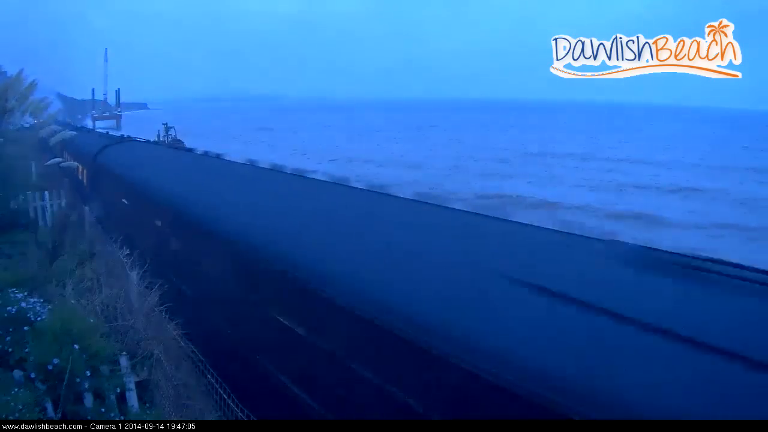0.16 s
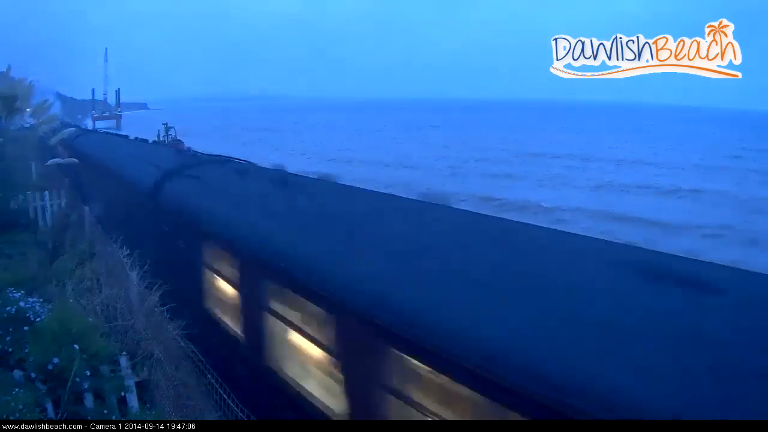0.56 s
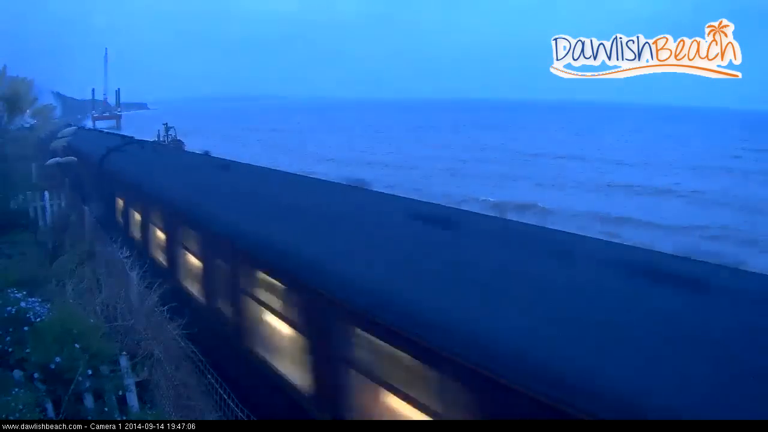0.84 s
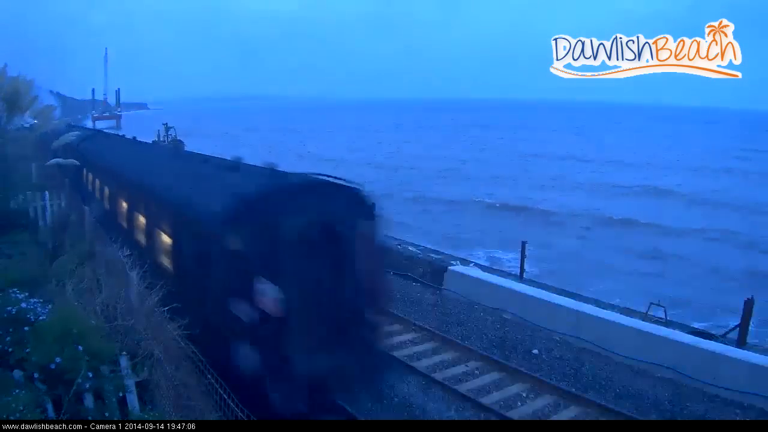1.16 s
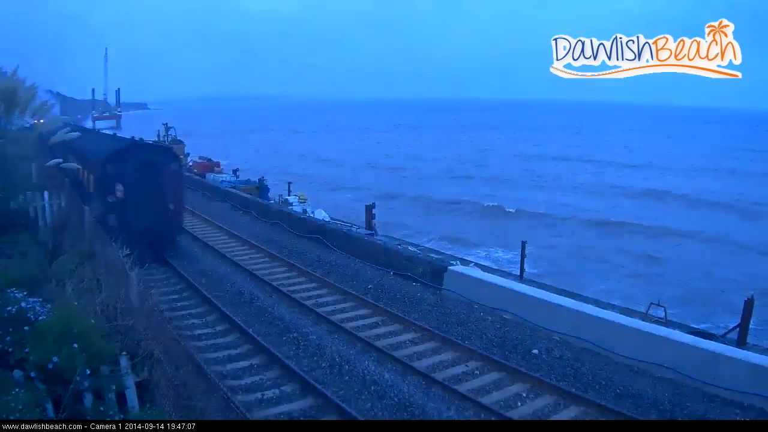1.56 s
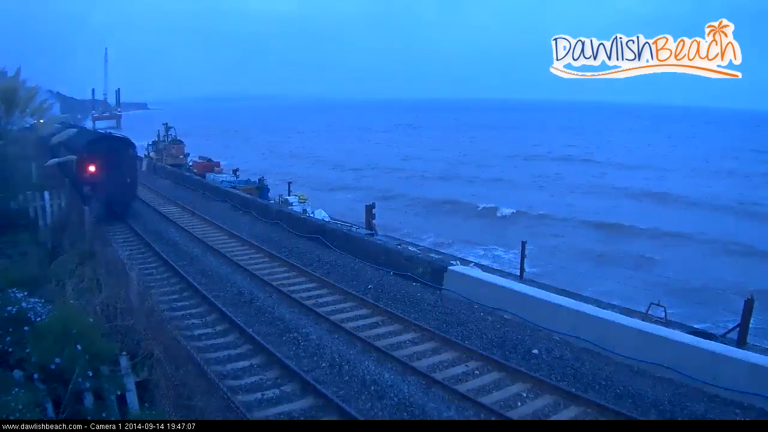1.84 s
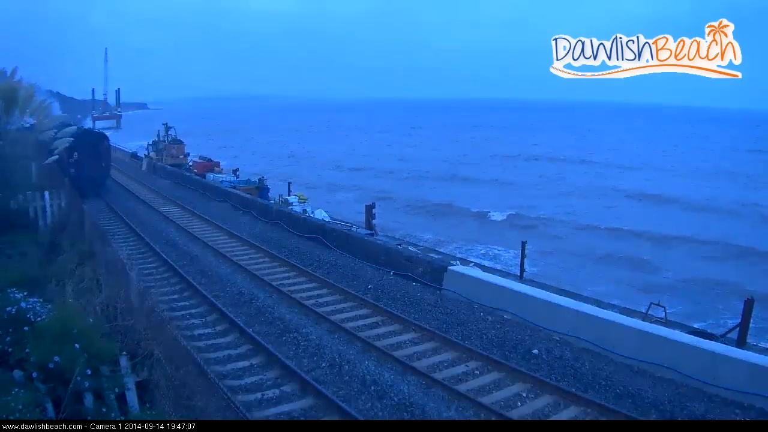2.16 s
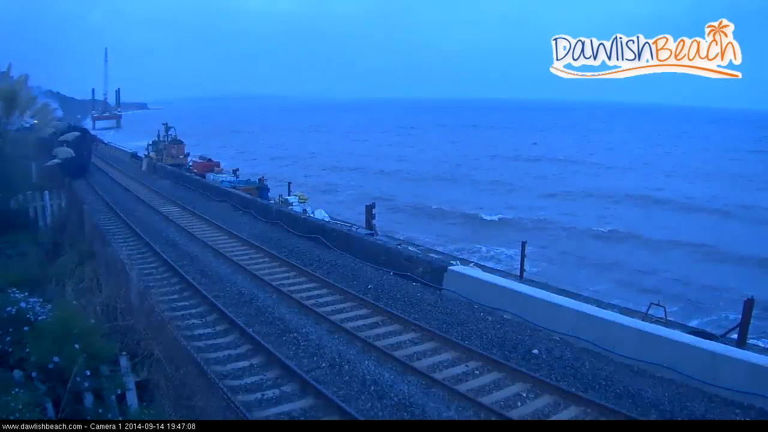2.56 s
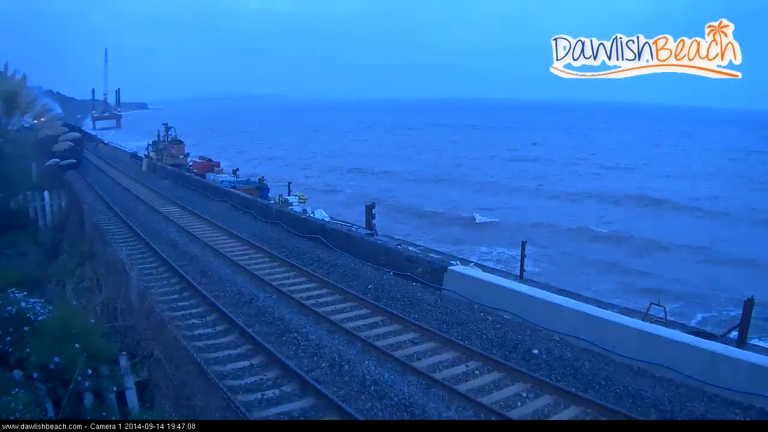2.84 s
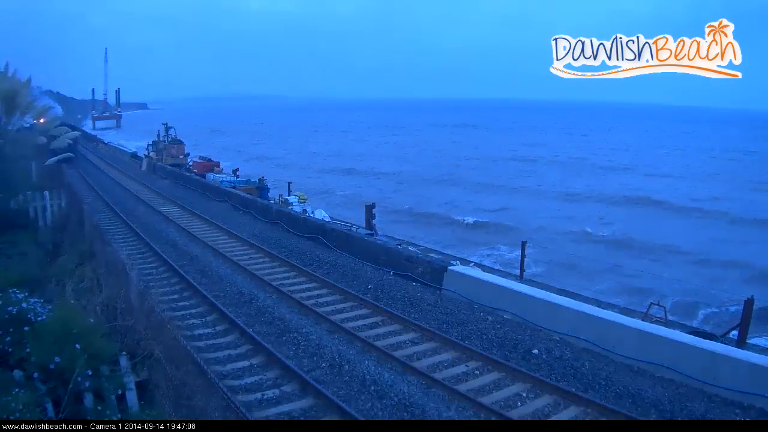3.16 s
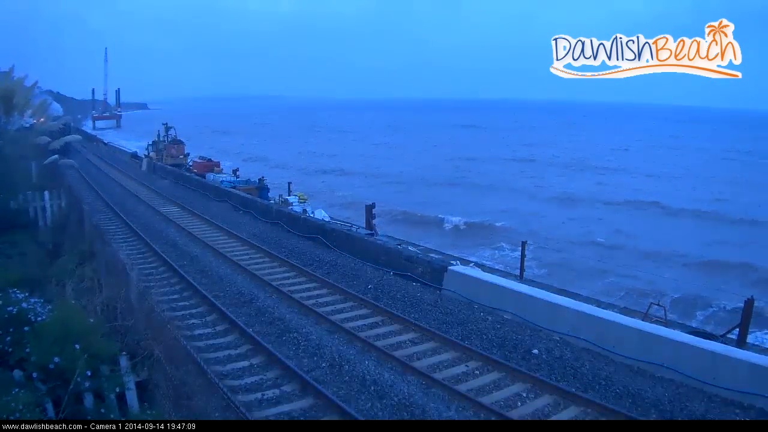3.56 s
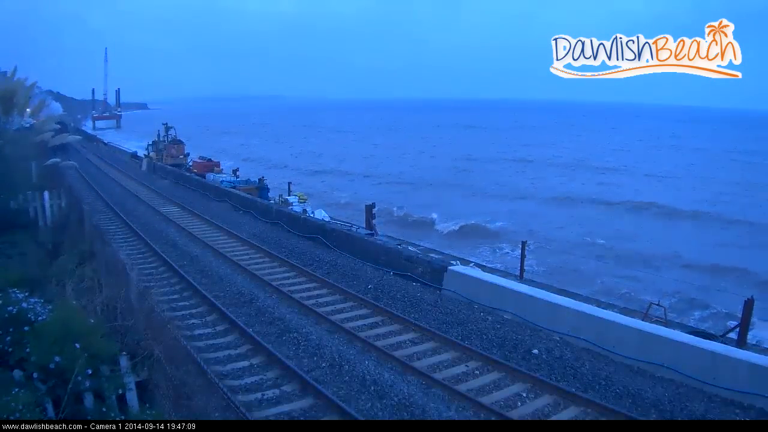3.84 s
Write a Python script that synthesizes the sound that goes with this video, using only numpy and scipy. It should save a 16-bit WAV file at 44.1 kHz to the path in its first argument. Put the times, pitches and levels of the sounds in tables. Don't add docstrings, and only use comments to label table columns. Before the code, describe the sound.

Passing train's last carriages grind and rumble loudly with crackling distortion, then fade away beside the sea.

```python
import sys
import numpy as np
from scipy import signal
from scipy.fft import rfft, irfft
from scipy.io import wavfile
from scipy.ndimage import uniform_filter1d

SR = 44100
rng = np.random.default_rng(int(sys.argv[2]) if len(sys.argv) > 2 else 0)


def magnitude_from_level(level_db):
    exponent = np.asarray(level_db, float) / 20
    return 10 ** exponent


def materialize(psi):
    bounded = np.clip(np.atleast_2d(psi).T, -1, 1)
    quanta = np.round(bounded * 32767).astype(np.int16)
    wavfile.write(sys.argv[1], SR, quanta)


N = 176400

# [t/s, length/s, level/dB]
WIND_GUSTS = [
    (1.204, 0.16, -46),
    (1.993, 0.14, -48),
    (2.45, 0.15, -48.5),
    (3.026, 0.11, -47.5),
    (3.797, 0.053, -50),
]
# [f/Hz, level/dB]
SEA_COLOUR = [(25, -26.5), (300, -19.5), (620, -6), (1570, -29.5), (2900, -46), (4500, -41.5), (13000, -48),
              (15500, -52)]
# [t/s, low wash level/dB, fizz lift/dB]
SEA_SWELL = [(0, -45, 18), (1.5, -32.5, 1), (2.5, -42, -5), (3.2, -34, -9), (3.5, -34.5, -8),
             (3.65, -32.5, -6.5), (3.85, -32.5, -3), (4, -43.5, -5.5)]
# [f/Hz, width/Hz, level/dB, fade/(dB per s)]
RAIL_SINGING = [
    (6600, 480, -70, -4),
    (8550, 500, -65, -9),
    (11700, 250, -72, -5),
]
# [t/s, length/s, level/dB]
WHISTLE_PATCHES = [(1.878, 0.049, -47), (2.05, 0.027, -48), (2.223, 0.12, -50.5), (2.417, 0.068, -56),
                   (2.66, 0.12, -57), (2.907, 0.045, -58), (3.06, 0.027, -61), (3.2, 0.055, -65),
                   (3.45, .15, -60), (3.643, 0.023, -61), (3.9, .1, -66)]
# [t/s, peak level/dB]
JOINT_KNOCKS = [(1.871, -8.5), (1.979, -17.5), (1.998, -10.5), (2.067, -15), (2.13, -17), (2.188, -17.5),
                (2.612, -24), (2.662, -26), (2.719, -25), (2.86, -30), (3.398, -29)]
# [t/s, roar level/dB, nearness of the wheels/dB]
TRAIN_PASS = [(0, -10, 4), (.2, -13.5, 9), (.4, -10, 8), (.65, -11.5, 3), (.9, -13, 6.5), (1.0, -15, 8),
              (1.12, -8.5, -1.5), (1.25, -14, -11), (1.37, -17, -14.5), (1.43, -18, -17.5),
              (1.65, -18.5, -22), (1.85, -23, -22.5), (2.0, -25, -30), (2.3, -26.5, -29), (2.55, -28, -31),
              (3.0, -29.5, -32), (3.5, -33, -33), (4, -31.5, -27)]
# [f/Hz, level/dB]
ROAR_COLOUR = [(30, -39), (385, -16), (445, -6.5), (740, -0.5), (1000, -15.5), (1400, -20), (1560, -30.5),
               (2750, -43.5)]
# [f/Hz, level/dB]
GRIND_COLOUR = [(30, -31), (120, -8), (450, -4), (900, 0), (1400, -9), (2500, -15), (5000, -28),
                (16000, -46)]
# [f/Hz, width/Hz, level against the roar/dB]
RAIL_HUM = [(550, 86, -13), (740.3, 21, -9), (636, 33, -20), (1110, 100, -42.5), (1366, 44, -16),
            (2245, 76, -34)]
# [f/Hz, width/Hz, level against the roar/dB]
WHEEL_RINGS = [(481.8, 114, -9), (636.3, 67, -9.5), (831.1, 159, -5.5), (1338, 95, -14.5)]
# [t/s, peak level/dB]
OVERLOAD_SNAPS = [(0.066, -28.5), (0.148, -22), (0.1832, -31), (0.3723, -25.5), (0.397, -22), (0.6055, -28),
                  (0.667, -28), (0.7195, -26), (0.7771, -28), (0.853, -32), (0.9838, -27), (1.0514, -39),
                  (1.0866, -37), (1.092, -28), (1.1344, -37), (1.153, -33), (1.167, -33), (1.1885, -36),
                  (1.2077, -33.5), (1.222, -35), (1.2752, -38.5), (1.3295, -38), (0.088, -28), (0.525, -29)]

WIND_DB, WIND_HZ, GUST_DB = -51.5, 38.6, -1
FIZZ_HZ = 2400
WHISTLE_HZ, WHISTLE_WIDTH_HZ, WHISTLE_BED_DB = 1975, 91, -61
KNOCK_HZ, KNOCK_RISE_S, KNOCK_DB = 696, 0.0027, -1.5
GRAINS_PER_S, GRAIN_S, GRAIN_SIZE = 160, .0025, .4
GRIND_DB, RUMBLE_HZ, RUMBLE_SHARE = -19.5, 400, 0.44
WHEEL_SHARE = 0.42
DOPPLER_DROP, PASS_S, PASS_WIDTH_S = .03, 1.1, 0.149
SNAP_DB, SNAP_S, SNAP_HZ = -3, 0.0012, 2100
TOP, BOTTOM, TOP_KNEE, BOTTOM_KNEE, RAIL = .19, .66, .09, .14, .64
SMOOTH_HZ, COUPLING_HZ = 5880, 70
GATE_HZ, GATE_SHARE = 13150, .46


def evened(x):
    return x / np.sqrt(np.mean(x ** 2) + 1e-20)


def read(points, hz):
    f, value = np.transpose(points)
    return np.interp(np.log(hz + 1), np.log(f + 1), value)


def curve(table, column):
    rows = np.array(table)
    return np.interp(np.arange(N) / SR, rows[:, 0], rows[:, column])


def slow(top_hz):
    t = np.arange(0, N + 100, 100) / SR
    speeds = np.geomspace(top_hz / 10, top_hz, num=24)
    wander = sum(np.sin(2 * np.pi * (f * t + rng.random())) / np.sqrt(f) for f in speeds)
    return np.interp(np.arange(N) / SR, t, evened(wander))


def below(x, hz):
    f = np.fft.rfftfreq(N, 1 / SR)
    return irfft(rfft(x) / (1 + (f / hz) ** 8), N)


def noise(spectrum, patchy_db):
    hz = np.fft.rfftfreq(1024, 1 / SR)
    a, b, patches = rng.standard_normal((N // 256 + 5, 513, 3)).T
    patches = uniform_filter1d(patches, size=8, axis=0)
    patches = evened(uniform_filter1d(patches, size=10, axis=1))
    z = (a + 1j * b) * magnitude_from_level(read(spectrum, hz)[:, None] + patchy_db * patches)
    return evened(signal.istft(z, nperseg=1024, noverlap=768)[1][:N])


def whistle(hz, width_hz):
    r = np.exp(-np.pi * width_hz / SR)
    z = rng.standard_normal(N) + 1j * rng.standard_normal(N)
    z = signal.lfilter([1], [1, -2 * r, r * r], z)
    turns = np.cumsum(hz * np.ones(N)) / SR
    return evened((z * np.exp(2j * np.pi * turns)).real)


def bumps(table):
    t = np.arange(N) / SR
    return sum(magnitude_from_level(db) * np.exp(-((t - s) / length) ** 2) for s, length, db in table)


def clicks(table, lift_db):
    out = np.zeros(N)
    for s, db in table:
        out[round(s * SR)] = magnitude_from_level(db + lift_db)
    return out


def wind():
    buffets = magnitude_from_level(WIND_DB + GUST_DB * slow(4.4)) * whistle(WIND_HZ, 30)
    return buffets + bumps(WIND_GUSTS) * whistle(60, 120)


def sea():
    wash = noise(SEA_COLOUR, 0.92)
    low = below(wash, FIZZ_HZ)
    fizz = (wash - low) * magnitude_from_level(-32.0 + curve(SEA_SWELL, column=2) + 1.2 * slow(10))
    return low * magnitude_from_level(curve(SEA_SWELL, column=1)) + fizz


def rail_song():
    t = np.arange(N) / SR
    swell = magnitude_from_level(WHISTLE_BED_DB) + bumps(WHISTLE_PATCHES)
    thin = np.zeros(N)
    for hz, width, db, fade_db in RAIL_SINGING:
        level_db = db + fade_db * np.maximum(t - 1.9, 0) + 1.3 * slow(15)
        thin += magnitude_from_level(level_db) * whistle(hz, width)
    return swell * whistle(WHISTLE_HZ, WHISTLE_WIDTH_HZ) + thin


def knocks():
    t = np.arange(2000) / SR
    u = t / KNOCK_RISE_S
    ring = u * np.exp(1 - u) * np.sin(2 * np.pi * KNOCK_HZ * t)
    return signal.oaconvolve(clicks(JOINT_KNOCKS, KNOCK_DB), ring)[:N]


def grains():
    hits = (rng.random(N) < GRAINS_PER_S / SR) * rng.exponential(GRAIN_SIZE, N)
    fade = np.exp(-np.arange(600) / SR / GRAIN_S)
    return evened(1 + signal.oaconvolve(hits, fade)[:N])


def grinding(near_db):
    grind = noise(GRIND_COLOUR, 0.82) * grains() * magnitude_from_level(GRIND_DB + near_db + 0.41 * slow(44))
    rumble_kept = magnitude_from_level(RUMBLE_SHARE * np.minimum(near_db + 15, 0))
    return grind - below(grind, RUMBLE_HZ) * (1 - rumble_kept)


def wheel_rings(near_db):
    t = np.arange(N) / SR
    glide = 1 - DOPPLER_DROP / 2 * np.tanh((t - PASS_S) / PASS_WIDTH_S)
    rings = sum(magnitude_from_level(db + 4.3 * slow(6.07)) * whistle(hz * glide, width) for hz, width, db in WHEEL_RINGS)
    return magnitude_from_level(WHEEL_SHARE * near_db) * rings


def train():
    near_db = curve(TRAIN_PASS, column=2)
    roar = noise(ROAR_COLOUR + [(3300, -79)], 0.91)
    hum = sum(magnitude_from_level(db + 2.4 * slow(14)) * whistle(hz, width) for hz, width, db in RAIL_HUM)
    hum = hum * magnitude_from_level(-.25 * np.maximum(near_db + 43.5, 0))
    body = roar + wheel_rings(near_db) + hum
    return magnitude_from_level(curve(TRAIN_PASS, column=1)) * body + grinding(near_db)


def scene():
    return (wind() + sea() + rail_song() + knocks() + train())[None]


def snaps():
    u = np.arange(400) / SR / SNAP_S
    bursts = signal.oaconvolve(clicks(OVERLOAD_SNAPS, SNAP_DB), u * np.exp(1 - u))[:N]
    dull = signal.butter(1, SNAP_HZ, fs=SR)
    return bursts * evened(signal.lfilter(*dull, rng.standard_normal(N)))


def overloaded(dry):
    capped = -TOP_KNEE * np.logaddexp(-dry / TOP_KNEE, -TOP / TOP_KNEE)
    soft = BOTTOM_KNEE * np.logaddexp(capped / BOTTOM_KNEE, -BOTTOM / BOTTOM_KNEE)
    smooth = signal.lfilter(*signal.butter(1, SMOOTH_HZ, fs=SR), soft)
    return np.maximum(smooth, -RAIL) + snaps()


def gated(x):
    hz, _, z = signal.stft(x, SR, nperseg=2048)
    power = uniform_filter1d(abs(z) ** 2, size=24, axis=1)
    power = uniform_filter1d(power, size=2, axis=2)
    top = hz > GATE_HZ
    faint = power < np.quantile(power[:, top & (hz < 15600)], GATE_SHARE)
    return signal.istft(z * ~(faint & top[:, None]), SR, nperseg=2048)[1][:, :N]


def roll_off(x):
    return signal.sosfilt(signal.butter(12, 15610, fs=SR, output="sos"), x)


def record(dry):
    out = overloaded(dry)
    centred = out - out[:, :400].mean()
    mix = gated(signal.lfilter(*signal.butter(1, COUPLING_HZ, "high", fs=SR), centred))
    return roll_off(mix)


dry = scene()
out = record(dry)
materialize(out)
```